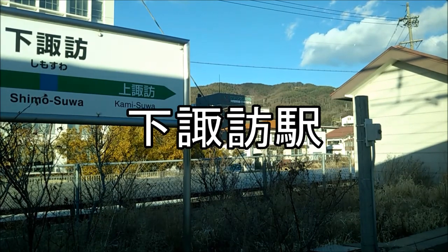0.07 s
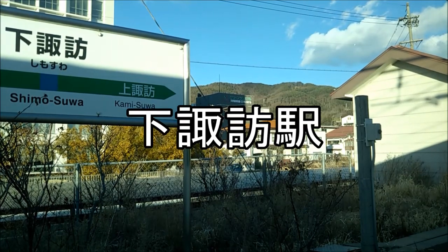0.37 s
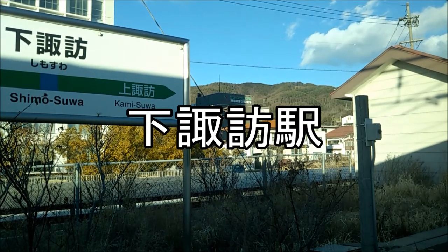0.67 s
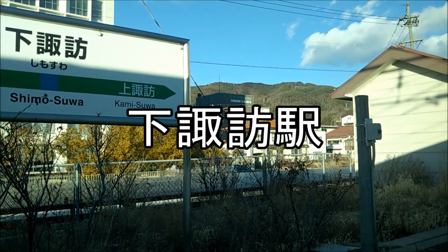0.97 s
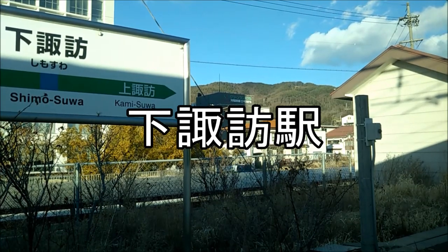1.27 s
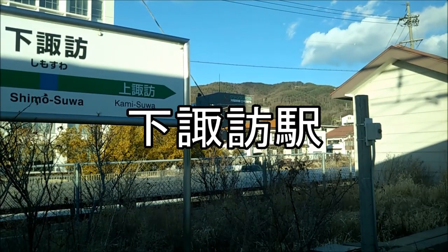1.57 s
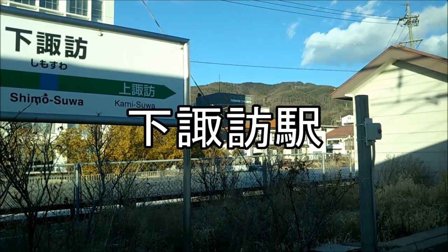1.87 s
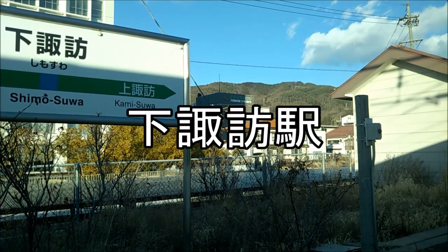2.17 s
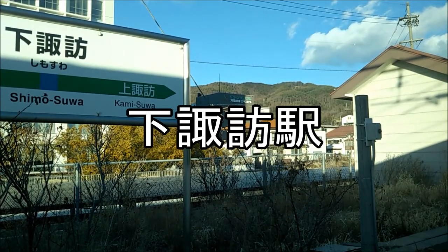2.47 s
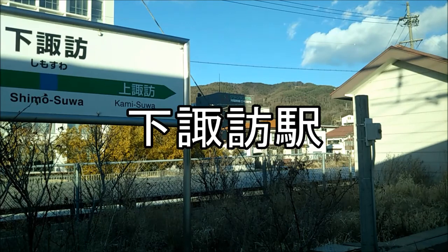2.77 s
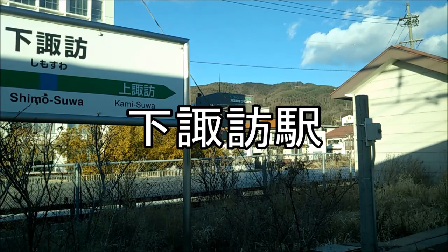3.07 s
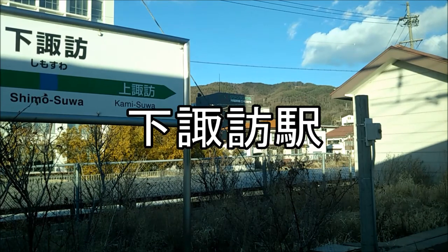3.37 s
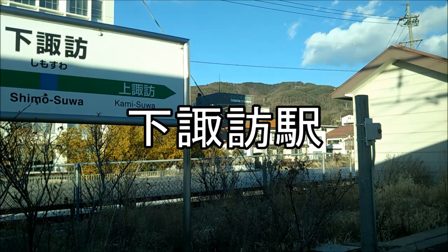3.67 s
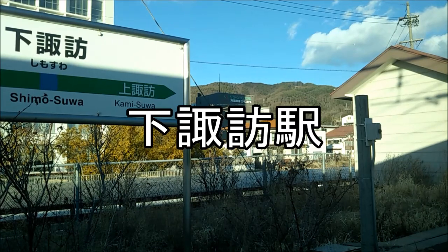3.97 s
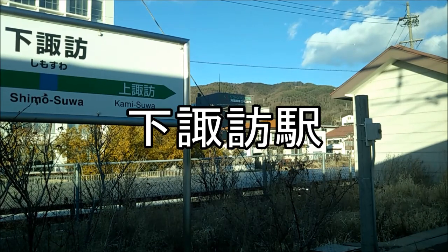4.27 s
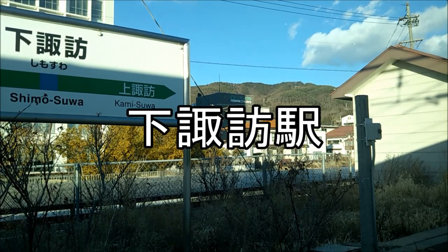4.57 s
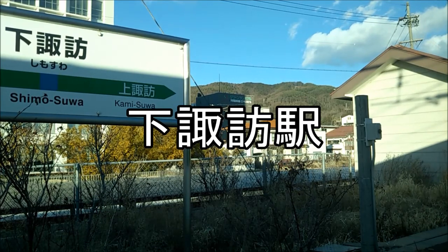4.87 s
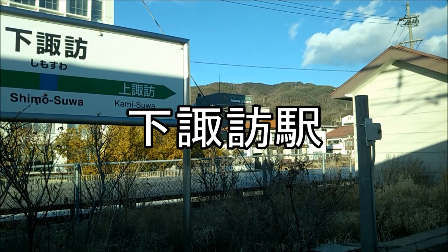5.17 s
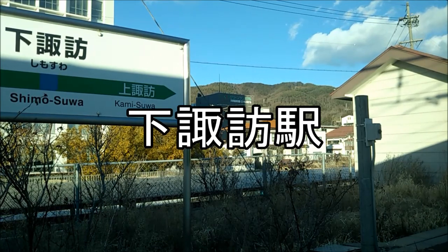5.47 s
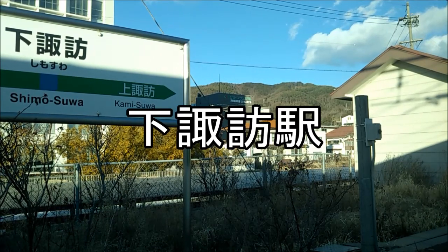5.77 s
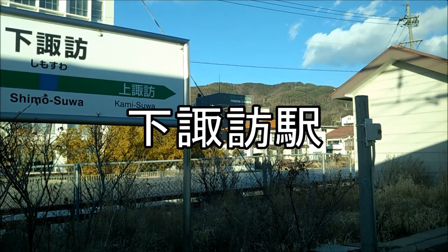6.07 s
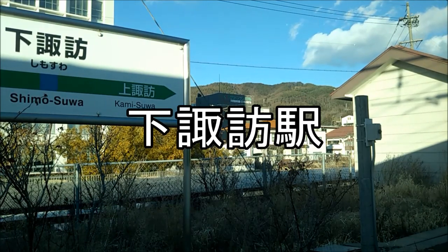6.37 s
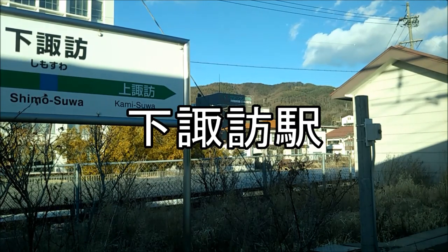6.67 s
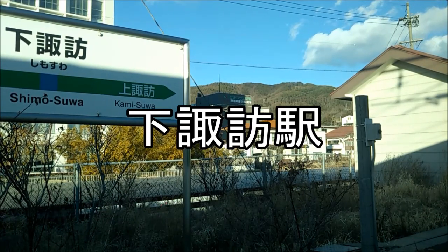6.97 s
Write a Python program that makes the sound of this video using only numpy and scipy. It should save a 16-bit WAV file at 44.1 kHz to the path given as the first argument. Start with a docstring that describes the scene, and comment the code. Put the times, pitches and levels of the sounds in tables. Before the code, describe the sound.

Steady electrical hum and ventilation fill a stopped train carriage, with one thud and, near the end, fabric rustle, a knock and rattles.

```python
"""An electric train's inverter (its power converter) hums on multiples of 120 Hz, heard from inside
while the train stands at a platform. Ventilation fans rush and sing, and a thin electronic whine cuts
in and out. Soft bumps and one firm thud sound in the carriage. Near the end clothing rustles and a
fitting is handled: a hollow knock, a sharp click and two short rattles."""
import sys
import numpy as np
from scipy.fft import rfft, irfft, next_fast_len
from scipy.io import wavfile
from scipy.ndimage import uniform_filter1d, map_coordinates

SR = 44100
rng = np.random.default_rng(int(sys.argv[2]) if len(sys.argv) > 2 else 0)


def log_audio(samples):
    """Write samples as a 16-bit WAV file to the path given in sys.argv[1]."""
    # one column per channel
    frames = np.atleast_2d(samples).T
    # limit to full scale, then quantise
    limited = np.clip(frames, -1, 1)
    pcm = np.round(limited * 32767).astype(np.int16)
    wavfile.write(sys.argv[1], SR, pcm)


N = 314165
TIME = np.arange(N) / SR
FREQS = np.maximum(np.fft.rfftfreq(N, 1 / SR), 1)


def from_db(db):
    """Turn decibels into a number to multiply by."""
    return 10 ** (np.asarray(db) / 20)


def colour(points):
    """Join (frequency [Hz], level [dB]) points into a gain for every frequency."""
    hz, db = np.transpose(points)
    return from_db(np.interp(np.log(FREQS), np.log(hz), db))


def bass_cut(hz):
    """A gain that falls steeply below the given frequency."""
    return 1 / np.sqrt(1 + (hz / FREQS) ** 8)


def resonances(modes):
    """A gain with one peak for each pitch at which an object rings."""
    power = sum(from_db(db) ** 2 / width / (1 + ((FREQS - hz) / width) ** 2) ** 2
                for hz, width, db in modes)
    return np.sqrt(power)


def noise(gain):
    """Noise whose strength at each frequency follows the given gain."""
    size = next_fast_len(N)
    gain = np.interp(np.fft.rfftfreq(size, 1 / SR), FREQS, gain)
    white = rng.standard_normal(size)
    return irfft(rfft(white) * gain, size)[:N] * np.sqrt(SR / 2)


def drift(rate):
    """A smooth random wobble, roughly 1 in size, that changes about rate times a second."""
    targets = rng.standard_normal(1024)
    coarse_time = TIME[::64]
    curve = map_coordinates(targets, [coarse_time * rate + 2], order=3, mode="wrap")
    return np.interp(TIME, coarse_time, curve)


def tone(hz, level_db, waver_db, wander_hz, rate):
    """A pure tone that wavers in level and wanders in pitch."""
    cycles = hz * TIME + np.cumsum(wander_hz * drift(rate)) / SR + rng.random()
    peak = np.sqrt(2) * from_db(level_db + waver_db * drift(rate))
    return peak * np.sin(2 * np.pi * cycles)


def burst(start, rise, hold, ring_s):
    """The strength of a blow: it builds, holds during contact, then fades by 60 dB in ring_s seconds."""
    age = TIME - start
    fade = from_db(-60 * np.clip((age - rise - hold) / ring_s, 0, 3))
    return np.clip(age / rise, 0, 1) * fade


def ringing(gain):
    """An object's dense ringing, made of noise and evened out so each blow keeps its strength."""
    ring = noise(gain)
    ring /= np.sqrt(np.mean(ring ** 2) + 1e-20)
    return ring / np.sqrt(uniform_filter1d(ring ** 2, size=500) + 1e-6)


def fans():
    """Moving air rushes steadily while fan blades and motors add slightly unsteady tones."""
    # rush and hiss of the air: (frequency [Hz], level [dB per Hz])
    air = [(25, -87), (40, -78), (60, -67.5), (105, -70), (220, -73), (300, -78), (400, -78.5),
           (1000, -81.5), (1450, -83.5), (1900, -86.5), (2500, -89.5), (4000, -92), (8000, -94),
           (13000, -94.5)]
    # blade and motor tones: (pitch [Hz], level [dB])
    fan_tones = [(330.9, -61.5), (389.2, -73), (535.0, -63), (653.7, -83), (663.0, -70), (675.7, -64),
                 (877.8, -67), (890.6, -71), (933.9, -71.5), (953.7, -70.5), (980.7, -64), (995.7, -72),
                 (1120.8, -59), (1137.1, -59.5), (1221.7, -77), (1325.9, -64), (1620.4, -85),
                 (1634.1, -62.5), (1657.6, -67)]
    rush = noise(colour(air) * bass_cut(hz=33))
    return rush + sum(tone(hz, db, waver_db=1.5, wander_hz=1.15, rate=6) for hz, db in fan_tones)


def whine():
    """Switching electronics give high, thin tones that start and stop together."""
    # tones of the whine: (multiple of the switching rate, level [dB])
    overtones = [(4, -71.9), (6, -72.0), (7, -70.8), (8, -73.8), (10, -70.0), (11, -72.4), (13, -77.3),
                 (14, -51.9)]
    # when it sounds: (start [s], end [s])
    on_times = [(1.100, 1.134), (1.337, 4.120), (4.944, 4.974), (6.007, 7.2)]
    switching_hz, fade_s = 1000, 0.004
    running = sum(np.clip(np.minimum(TIME - start, end - TIME) / fade_s, 0, 1)
                  for start, end in on_times)
    return running * sum(tone(multiple * switching_hz, db, waver_db=1.0, wander_hz=0.19, rate=4)
                         for multiple, db in overtones)


def bumps():
    """Each soft bump makes the carriage ring over one broad band of pitches."""
    # taps on the floor and seats: (time [s], level [dB], band centre [Hz], band width [octaves])
    taps = [(1.14, -45, 900, .6), (1.24, -38, 74.5, 0.61), (1.295, -40, 75, .7), (1.785, -41, 1300, 0.57),
            (2.283, -43.5, 1080, .9), (2.948, -38, 230, 0.95), (2.959, -38.5, 830, 0.9),
            (3.025, -41, 90, .9), (3.085, -44.5, 1400, .7), (3.748, -42, 1500, 0.89),
            (4.429, -43, 1400, 1.4), (6.089, -38, 200, 1), (6.82, -44, 79.6, 0.58), (6.92, -37.5, 110, .7)]
    out = np.zeros(N)
    for start, db, hz, octaves in taps:
        band = 1 / (1 + (np.log2(FREQS / hz) / octaves) ** 2) ** 2
        ring_s = 0.16 * (1000 / hz) ** 0.15   # low bumps ring longer
        strength = from_db(db) * burst(start, rise=0.0036, hold=0, ring_s=ring_s)
        out += strength * ringing(band * bass_cut(hz=48))
    return out


def thud():
    """One firm blow makes the floor ring briefly."""
    # the floor's tones: (pitch [Hz], relative level [dB], time to fade by 60 dB [s])
    floor = [(196, -2.5, 0.1), (328, -5, 0.025), (785, -6, 0.04), (960, -7, 0.028), (1970, -9.5, 0.02)]
    start_s, blow_db = 2.9465, -27
    age = np.clip(TIME - start_s, 0, 1)
    return sum(from_db(blow_db + db - 60 * age / ring_s) * np.sin(2 * np.pi * hz * age)
               for hz, db, ring_s in floor)


def clothing():
    """Fabric slides unevenly: light strokes swish, firmer ones make a duller rubbing sound."""
    # dull rubbing: (frequency [Hz], relative level [dB])
    rub_shape = [(200, -101), (500, -85.5), (1000, -79.5), (1800, -82), (3000, -90.5), (6000, -105.5),
                 (13000, -110)]
    # light swish: (frequency [Hz], relative level [dB])
    swish_shape = [(1500, -110), (3200, -92), (5200, -89.5), (7500, -94.5), (10000, -100), (14000, -110)]
    # strokes of the fabric: (start [s], length [s], rubbing gain [dB], swish gain [dB])
    strokes = [(5.25, 1.0, -4, 0.5), (5.616, 0.8, 3, -1), (5.77, 0.093, 6.5, 1), (5.994, 0.58, 1.5, -0.5),
               (6.71, 0.45, 2.5, -2)]
    rub = swish = 0
    for start, length, rub_db, swish_db in strokes:
        speed = np.interp((TIME - start) / length, [0, 0.19, 1], [0, 1, 0])   # quick start, slow stop
        rub = np.hypot(rub, from_db(rub_db) * speed)   # overlapping strokes add their power
        swish = np.hypot(swish, from_db(swish_db) * speed)
    flutter = from_db(1.3 * drift(rate=60))
    return flutter * (rub * noise(colour(rub_shape)) + swish * noise(colour(swish_shape)))


def fitting():
    """Each touch shakes a hollow panel, a metal catch and loose parts; each fades at its own rate."""
    # ringing of the panel: (pitch [Hz], width [Hz], relative level [dB])
    panel_modes = [(520, 40, -15), (690, 51, -10.5), (896, 45, -4), (1011, 37, 1.5), (1200, 72, -3.5),
                   (1430, 43, -2.5), (1575, 57, -2.5), (1650, 51, -9)]
    # ringing of the catch: (pitch [Hz], width [Hz], relative level [dB])
    catch_modes = [(2070, 76, -1.5), (2280, 91, 2), (2900, 240, 4), (4150, 300, 3), (4980, 300, 1),
                   (5800, 340, -3.5), (6820, 130, 0), (7350, 270, -1.5), (8880, 560, 0.5),
                   (11100, 1000, -6.5)]
    # loose parts: (frequency [Hz], relative level [dB])
    rattle_shape = [(150, 2.5), (400, 0.5), (1000, 3), (1900, 0.5), (3500, -2.5), (6000, -5.5),
                    (8000, -11.5), (13000, -24)]
    # knock, click, two rattles: (time [s], rise [s], hold [s], panel [dB], catch [dB], rattle [dB])
    contacts = [(6.596, .006, 0.016, -23, -50, -33), (6.679, .002, .003, -52, -31.5, -47),
                (6.853, .032, .010, -37.5, -46.5, -34.5), (6.949, .012, 0.014, -53, -42.5, -38)]
    panel = ringing(resonances(panel_modes))
    catch = ringing(resonances(catch_modes))
    rattle = ringing(colour(rattle_shape)) * from_db(1.7 * drift(rate=300))
    out = np.zeros(N)
    for start, rise, hold, panel_db, catch_db, rattle_db in contacts:
        out += from_db(panel_db) * burst(start, rise, hold, ring_s=0.16) * panel
        out += from_db(catch_db) * burst(start, rise, hold, ring_s=0.15) * catch
        out += from_db(rattle_db) * burst(start, rise, hold, ring_s=0.17) * rattle
    return out


def inverter():
    """Magnetic pull shakes the transformer: a steady drone, a swelling high tone and a weaker hum."""
    # swell of the high tone: (time [s], level [dB])
    swell = [(0.1, -53), (2.5, -49.5), (2.85, -56), (3.3, -54.5), (3.6, -48.5), (4.3, -48.5), (5.7, -49.5),
             (6.1, -53)]
    # weaker tones: (multiple of hum_hz, level [dB])
    hum_tones = [(1, -57), (3, -73.5), (6, -63.5), (11, -59), (13, -68.5), (14, -60), (15, -67.0),
                 (16, -69.5), (18, -76.4)]
    hum_hz = 120.01   # the pull comes twice in each cycle of the 60 Hz supply
    drone = tone(2 * hum_hz, level_db=-42.5, waver_db=0.55, wander_hz=0.2, rate=6)
    swell_db = np.interp(TIME, *np.transpose(swell))
    high_tone = tone(12 * hum_hz, swell_db, waver_db=1.1, wander_hz=0.18, rate=6)
    hum = sum(tone(multiple * hum_hz, db, waver_db=0, wander_hz=0.17, rate=2.92)
              for multiple, db in hum_tones)
    return drone + high_tone + hum


def scene():
    """All the sounds of the carriage added up, the same on the left and right."""
    carriage = inverter() + fans() + whine() + clothing() + bumps() + thud() + fitting()
    return np.array([carriage, carriage])


def record(dry):
    """The highest treble steps down a little, then is cut off steeply."""
    step_down = from_db(np.interp(FREQS, [14100, 14400], [0, -9]))
    cut = from_db(np.interp(FREQS, [15400, 15700], [0, -80]))
    return irfft(rfft(dry) * step_down * cut, N)


dry = scene()
out = record(dry)
log_audio(out)
```